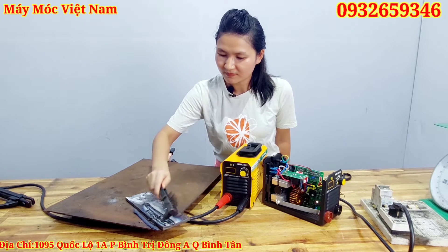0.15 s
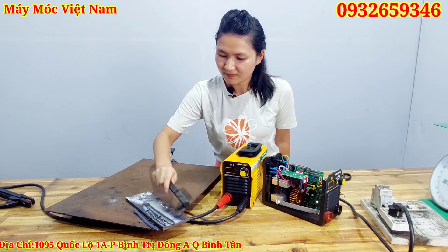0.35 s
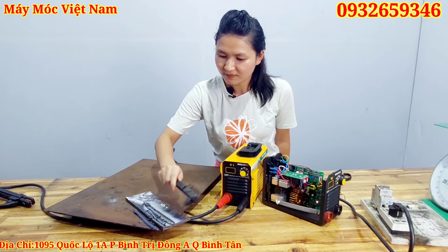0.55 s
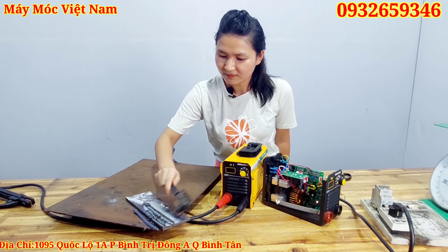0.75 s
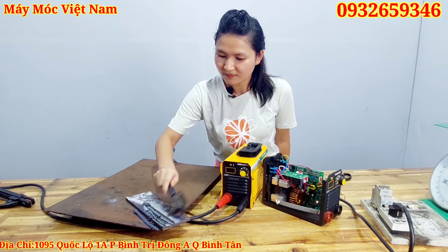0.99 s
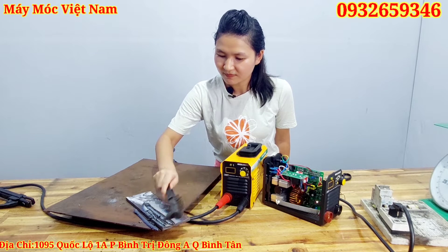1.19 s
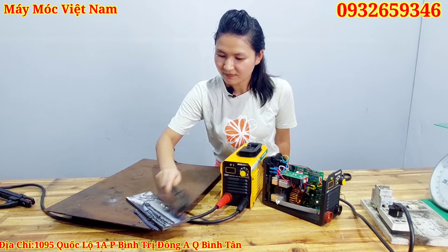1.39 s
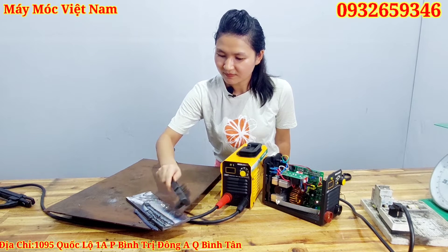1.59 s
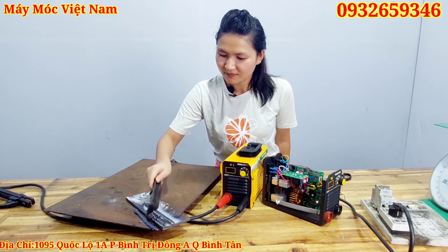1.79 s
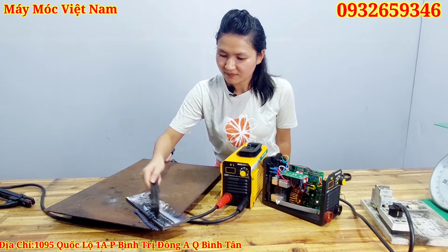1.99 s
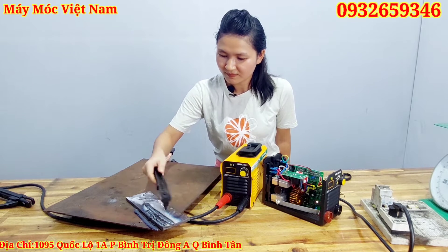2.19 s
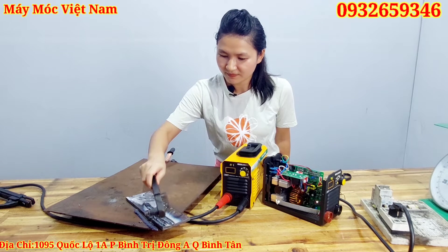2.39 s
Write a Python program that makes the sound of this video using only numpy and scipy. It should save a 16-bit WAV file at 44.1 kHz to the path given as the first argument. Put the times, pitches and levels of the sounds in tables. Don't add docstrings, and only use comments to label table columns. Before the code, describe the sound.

Steady metallic hammer blows on a small steel piece, each clank bright, rattling and quickly choked

```python
import sys
import numpy as np
from scipy import signal
from scipy.fft import rfft, irfft
from scipy.io import wavfile
from scipy.ndimage import uniform_filter1d, minimum_filter1d

SR = 44100
rng = np.random.default_rng(int(sys.argv[2]) if len(sys.argv) > 2 else 0)


def makeup_ratio(level_db):
    decades = np.asarray(level_db, float) / 20
    return 10 ** decades


def persist_wave(psi):
    counts = np.round(np.clip(psi, -1, 1) * 32767).astype(np.int16)
    wavfile.write(sys.argv[1], SR, np.atleast_2d(counts).T)


N = 108045
LEAD = 4410
DRIVE_DB = 2.5


def at_hz(points, hz):
    points = np.array(points)
    return np.interp(np.log(hz), np.log(points[:, 0]), points[:, 1])


def dying(t, t60_s):
    return np.exp(-np.log(1000) * t / t60_s)


def filtered(x, order, hz, kind="low"):
    return signal.sosfilt(signal.butter(order, hz, kind, fs=SR, output="sos"), x)


# hz, level_db
FLOOR_SPECTRUM = [(25, -24), (55, -9.5), (150, -1), (400, -9.5), (1000, -15), (4000, -19.5), (9000, -35.5),
                  (14000, -52)]
FLOOR_DB = -53.5


def floor():
    hz = np.maximum(np.arange(N // 2 + 1) * SR / N, 10)
    x = irfft(rfft(rng.standard_normal(N)) * makeup_ratio(at_hz(FLOOR_SPECTRUM, hz)), N)
    return makeup_ratio(FLOOR_DB) * x / x.std()


# start_s, peak_db, thump_db (bench), clatter_db, clatter_tilt_db_per_octave
BLOWS = [
    (-.04, -18, -6, -9.5, 8.5),
    (0.2269, -15.5, 1.5, 6.5, 2),
    (0.5096, -17.5, 2, 1, -0.5),
    (0.761, -18, 10.5, 2.5, 2),
    (0.9978, -14, 3.5, 6, 3),
    (1.248, -16, 4.5, 8, 0),
    (1.5250, -19, 7, 12.5, 1),
    (1.7818, -15, 1.5, 8, 3),
    (2.0569, -13, 0, 5.5, 3),
]


def each_blow(sound):
    out = np.zeros(N + LEAD)
    starts = [int(blow[0] * SR) + LEAD for blow in BLOWS] + [N + LEAD]
    for k, start in enumerate(starts[:-1]):
        end = min(starts[k + 1] + 880, N + LEAD)
        t = np.arange(end - start, dtype=np.float32) / SR
        out[start:end] += sound(k, t)
    return out


# delay_s, loss_db, ring_time_factor
LANDINGS = [(0.013, 29, 0.87), (0.0298, 21.5, 1.234), (0.0223, 16.5, 0.91), (0.07, 34, 0.8),
            (0.044, 13, 0.86), (0.026, 5, 1), (0.078, 7, 0.81), (0.031, 1.5, 0.94), (0.034, 8.5, 1.002)]
# delay_s, strength_db, bench_tilt_db_per_octave
BOUNCES = [(.02, -20, -6), (0.022, -10, -0.8), (.016, 2.5, -1.2), (0.011, -7, -2), (0.033, -30, 0),
           (0.028, 0.5, -1), (0.013, -9, 0.5), (0.0223, 1, -1.2), (.014, -3, -0.8)]
RISE_S, BOUNCE_S, LAND_S, STOP_S = 0.0014, 0.018, 0.0015, 0.0025


def envelope(k, t, t60_s, choked):
    land_s, loss_db, factor = LANDINGS[k]
    bounce_s, bounce_db, _ = BOUNCES[k]
    until_s = BLOWS[k + 1][0] - BLOWS[k][0] if k + 1 < len(BLOWS) else 1
    rise = 1 - np.exp(-t / RISE_S)
    since = np.maximum(t - bounce_s, 0)
    touch = makeup_ratio(bounce_db) * (1 - np.exp(-since / LAND_S)) * np.exp(-since / BOUNCE_S)
    again = 1 + touch * np.sqrt(np.abs(choked))[:, None]
    landed = np.clip((t - land_s) / LAND_S, 0, 1)
    choke = makeup_ratio(-loss_db * np.outer(choked, landed))
    stop = np.exp(-np.maximum(t - until_s, 0) / STOP_S)
    return again * dying(t, factor * t60_s[:, None]) * choke * rise * stop


def bursts(rows, t60_s, low_hz, high_hz):
    out, t = np.zeros(N + LEAD + 4410), np.arange(4410) / SR
    for start_s, db in rows:
        start = int(start_s * SR) + LEAD
        out[start:start + 4410] += makeup_ratio(db) * rng.standard_normal(4410) * dying(t, t60_s)
    return filtered(out, 2, [low_hz, high_hz], "band")[:N + LEAD]


def cracks():
    return bursts([(blow[0], blow[1] - 16.5) for blow in BLOWS], 0.0043, 8240, 13000)


GLIDES = [0.045, 0.019, 0.017, 0.036, .1, 0.036, 0.094, 0.059, 0.022]
GLIDE_S, SWELL_S = 0.0191, 0.013
FLUTTER_DB, FLUTTER_PER_S = 2.5, 40.3
SHRILL_HZ = 6000


def struck(hz, db, t60_s, choked, flutter_db, glide=0):
    phase = rng.uniform(0, 2 * np.pi, db.shape)
    knots = rng.standard_normal(db.shape + (40,))

    def sound(k, t):
        coarse = np.arange(len(t) // 16 + 2) * 16 / SR
        at = np.minimum(coarse * FLUTTER_PER_S, 38)
        knot, between = at.astype(int), at % 1
        waver = knots[k][:, knot] * (1 - between) + knots[k][:, knot + 1] * between
        shape = envelope(k, coarse, t60_s, choked) * makeup_ratio(flutter_db[:, None] * waver)
        shape *= 1 - np.outer(glide * hz > 0, np.exp(-coarse / SWELL_S))
        step, part = np.divmod(np.arange(len(t)), 16)
        shape = shape[:, step] + np.diff(shape)[:, step] * (part / 16)
        lag = np.outer(GLIDES[k] * glide * hz, GLIDE_S * (1 - np.exp(-t / GLIDE_S)))
        cycles = np.outer(hz, t) - lag
        return makeup_ratio(db[k]) @ (np.sin(2 * np.pi * cycles + phase[k, :, None]) * shape)
    return each_blow(sound)


PLATE_HZ = [
    [563.5],
    [582],
    [812, 2160],
    [1009],
    [1089],
]
PIECE_HZ = [
    [1200, 1228, 1240],
    [1306, 1995, 1965],
    [1550, 1475, 1760, 1812],
    [1603],
    [2312, 2575, 2960],
]
SEAM_HZ = [
    [3177, 3213, 2850],
    [3297, 3456],
    [3818, 3786],
    [5830, 5996, 5968],
    [7882, 11800],
]
HAMMER_HZ = [
    [3890, 4035],
    [4160, 4225, 4580, 4790],
    [4288],
    [5385],
    [8440, 9610, 10190, 8800, 14080, 14260],
]
TIP_HZ = [
    [6676, 6640],
    [10970, 11040],
    [14170, 14350],
]
# level_db, t60_s
PLATE = [(-22.0, 1.05), (-28, 0.69), (-36, 0.79), (-34, 0.68), (-35.0, 1.25), (-30.0, 1.42)]
# level_db, t60_s
PIECE = [(-14, 0.28), (-5, 0.42), (-17, 0.43), (-15, 0.28), (-12.5, 0.33), (-21.5, 0.42), (-11.5, 0.11),
         (-32, 0.31), (-28.5, 0.4), (-37, 0.39), (-15.5, 0.6), (-26, 0.64), (-22.5, 0.4), (-20.5, 0.28)]
# level_db, t60_s
SEAM = [(-16, 0.29), (-18.5, 0.49), (-29.5, 0.35), (-14, 0.22), (-19.0, 0.37), (-9.5, 0.3), (-19, 0.24),
        (-23.0, 0.39), (-22.5, 0.27), (-23.5, 0.49), (-26.5, 0.19), (-53, 0.2)]
# level_db, t60_s
HAMMER = [(-14, 0.28), (-9.5, 0.059), (-23, 0.21), (-15, 0.28), (-18.5, 0.17), (-30, 0.19), (-25, 0.64),
          (-22.5, 0.95), (-59, 0.16), (-38, 0.17), (-48, 0.29), (-44, 0.4), (-55, 0.2), (-50, 0.18)]
# level_db, t60_s
TIP = [(-20, 0.41), (-13, 0.12), (-43, .4), (-49, .15), (-58, .15), (-58, .12)]
PLATE_SHARES = [(-11.5, -13, -1, 4.5, 12.5), (1.5, 2.5, 5, 6, -3), (5, 3, 0, 9, -1.0), (5, 11, 5, 10.5, 3),
                (-1, 8, -2, 0, -4), (7, 9, 6.5, -15, 10.5), (-8, -10, 15.5, -8, 5), (1.5, 6, 10.5, -19, -6),
                (-0.5, 6, 0.0, -17, 6)]
PIECE_SHARES = [(-14, -21, -9.0, -14.5, -12.0), (0.5, 6.5, 7, -1.5, 2), (-2.5, -3, -17, 0, -12),
                (-1.5, -3, 5.5, -20, -7), (-6, -10.5, 6, 2.5, 1), (-2.5, -4.5, 10, 1, 2),
                (4.5, 6, 16, 5, 4.0), (1.5, 5.5, 1, -0.5, 2), (3.5, 4, -22, -7.5, -14)]
SEAM_SHARES = [(-5, -22, -10, -38, -21), (-9, 3, 0, 15.5, 0.0), (-13, -16.5, -17.5, -3.5, 2),
               (-12, -2.5, -2, 3.5, -12), (2.5, -3.5, 0, -3, -15), (2.5, -2, 1, -2.5, -1),
               (7, -6, 4.5, 3.5, 20.5), (1.5, 5.5, -2, 2, 1), (6.5, 6.5, 9.5, -1.0, -6.0)]
HAMMER_SHARES = [(-10, -5, -11, -13, 0), (-11, -19, 2.0, 15, 3), (-11, -0.5, -3.0, -8.0, 5),
                 (9.5, 7.5, 6.5, 5, 16.5), (2, 8.5, 12.0, 8, 8.5), (0.5, 0, -2, -5.5, -2),
                 (8, 8, -12, 3, -4), (-5, -2.5, -21, -1.5, 4), (6.5, -19, -4, -19, -8)]
TIP_SHARES = [(-8, -8, -8), (-0.5, 9, 4), (-6.5, 0, 1), (-1, 1.5, 7), (7, 10, 4), (3, -2, -3),
              (8.5, -3, 1.5), (-21, -6, 1.5), (4.5, 2, -3)]
CHOKED = [(0.13, 0.17, 0.05, 0.048, 0.031), (0.21, 0.39, 0.63, 0.14, 0.16), (0.6, 0.55, 1, 0.96, .3),
          (.29, 0.28, 0.22, 1.3, 0.1)]
TIP_CHOKED = [0.51, .2, .3]


def steel():
    families = PLATE_HZ + PIECE_HZ + SEAM_HZ + HAMMER_HZ + TIP_HZ
    hz = np.concatenate(families)
    family = np.repeat(np.arange(len(families)), [len(f) for f in families])
    db, t60_s = np.transpose(PLATE + PIECE + SEAM + HAMMER + TIP)
    shares = np.hstack([PLATE_SHARES, PIECE_SHARES, SEAM_SHARES, HAMMER_SHARES, TIP_SHARES])[:, family]
    choked = np.append(CHOKED, TIP_CHOKED)[family]
    scatter_db = 1.0 * rng.standard_normal(shares.shape)
    db = db + shares + np.array(BLOWS)[:, 1:2] + scatter_db
    flutter_db = FLUTTER_DB * np.sqrt(np.abs(choked)) * (1.22 + hz / SHRILL_HZ)
    bending = family == len(PLATE_HZ)
    return struck(hz, db, t60_s, choked, flutter_db, bending)


# pitch_hz, level_db, t60_s
RUSH = [(670, -58, 0.075), (1085, -31.5, 0.15), (1727, -23.5, 0.14), (3045, -30.5, 0.26), (3460, -26, 0.23),
        (5750, -31, 0.087), (8200, -61, 0.04), (11600, -72, 0.089)]
CLATTER_CHOKED = 0.55


def rush():
    hz, db, t60_s = np.transpose(RUSH)
    bands = np.array([filtered(rng.standard_normal(N), 3, [f / 1.203, f * 1.228], "band") for f in hz])
    bands /= bands.std(axis=1, keepdims=True)

    def sound(k, t):
        _, peak_db, _, own_db, tilt = BLOWS[k]
        gains = makeup_ratio(db + 8 + peak_db + own_db + tilt * np.log2(hz / 2500))
        noise = bands[:, k * 9000:][:, :len(t)]
        return gains @ (noise * envelope(k, t, t60_s, CLATTER_CHOKED + 0 * hz))
    return each_blow(sound)


# hz, level_db
CLATTER = [(150, -34.5), (420, -23), (978, -23.5), (1200, -5.5), (1430, -17.5), (3890, -19), (8040, -27.5),
           (14500, -59), (15500, -103)]
CLATTER_DB, CLATTER_T60_S, CLATTER_T60_SLOPE = -9, 0.087, -0.45


def clatter():
    hz = np.linspace(16, 124, num=130) ** 2 * rng.uniform(0.96, 1.02, size=130)
    _, peak_db, _, own_db, tilt = np.transpose(BLOWS)[:, :, None]
    db = CLATTER_DB + peak_db + own_db + tilt * np.log2(hz / 2500) + at_hz(CLATTER, hz)
    db = db + 5 * rng.standard_normal(db.shape)
    t60_s = CLATTER_T60_S * (hz / 2500) ** CLATTER_T60_SLOPE * rng.uniform(0.34, 1.54, len(hz))
    flutter_db = FLUTTER_DB * (0.58 + hz / SHRILL_HZ)
    return struck(hz, db, t60_s, CLATTER_CHOKED + 0 * hz, flutter_db)


# pitch_hz, level_db, t60_s
THUMP = [(122, -25, 0.049), (209.5, -18, 0.048), (302, -20.5, 0.081), (410.7, -21.5, 0.11),
         (517.4, -10, 0.075)]


def bench():
    hz, db, t60_s = np.transpose(THUMP)
    blow_db = np.array(BLOWS)[:, 1:3].sum(axis=1, keepdims=True)
    tilt_db = np.outer(np.array(BOUNCES)[:, 2], np.log2(hz / 300))
    db = db + blow_db + tilt_db
    return struck(hz, db + 1.4 * rng.standard_normal(db.shape), t60_s, 0 * hz, 0 * hz)


ROOM_DB, ROOM_T60_S, ROOM_DULL_HZ, ROOM_GAP_S = -6.5, 0.46, 4580, 0.0026


def room(x):
    t = np.arange(SR) / SR
    noise = rng.standard_normal(SR) * (t > ROOM_GAP_S)
    low = filtered(noise, 1, ROOM_DULL_HZ)
    tail = low * dying(t, ROOM_T60_S) + (noise - low) * dying(t, 0.75 * ROOM_T60_S)
    tail /= np.sqrt(np.sum(tail ** 2))
    return makeup_ratio(ROOM_DB) * signal.fftconvolve(x, tail)[:len(x)]


# start_s, level_db
TICKS = [(.127, -47.5), (.170, -53), (.638, -46.5), (.646, -41), (.68, -48), (.740, -49), (.915, -39.5),
         (.938, -47), (1.122, -50), (1.18, -47), (1.227, -49), (1.5295, -41), (2.071, -44)]


def ticks():
    return bursts(TICKS, t60_s=0.021, low_hz=2530, high_hz=8300)


# start_s, pitch_hz, level_db, length_s
RINGS_AGAIN = [(.342, 5998, -41, .018), (.921, 5385, -47, .022), (.956, 5385, -50, .011),
               (.972, 5385, -52, .03), (1.077, 5385, -37, .010), (1.142, 5385, -43, .008),
               (1.163, 5385, -45, .059), (1.227, 5385, -51, .03), (.918, 4285, -47, .09)]
RING_AGAIN_T60_S = 0.47


def rings_again():
    t = np.arange(N + LEAD) / SR - LEAD / SR
    out = np.zeros(N + LEAD)
    for start_s, hz, db, length_s in RINGS_AGAIN:
        gate = np.clip(np.minimum(t - start_s, start_s + length_s - t) / RISE_S, 0, 1)
        gate = gate * dying(np.maximum(t - start_s, 0), RING_AGAIN_T60_S)
        out += makeup_ratio(db - DRIVE_DB) * np.sin(2 * np.pi * hz * t) * gate
    return out


STEEL_WET = 0.34
MIC_LOW_HZ, ROUGH_TOP_HZ = 94, 12900


def scene():
    crack = cracks()
    clear = steel() + rings_again()
    rough = filtered(rush() + clatter() + bench() + ticks(), 6, ROUGH_TOP_HZ)
    heard = clear + rough + crack + room(STEEL_WET * clear + rough)
    heard = filtered(heard, 2, MIC_LOW_HZ, "high")
    return (makeup_ratio(DRIVE_DB) * heard[LEAD:] + floor())[None]


def roll_off(x):
    return signal.sosfilt(signal.butter(12, 16470, fs=SR, output="sos"), x)


LIMIT_DB, RELEASE_DB_PER_S, LOOKAHEAD_S = -6.7, 203, 0.003


def record(dry):
    ahead = max(int(LOOKAHEAD_S * SR), 2)
    slope = RELEASE_DB_PER_S * np.arange(N) / SR
    over = np.maximum(20 * np.log10(np.abs(dry[0]) + 1e-9) - LIMIT_DB, 0)
    held = np.maximum.accumulate(over + slope) - slope
    held = -minimum_filter1d(-held, size=2 * ahead + 1)
    held = uniform_filter1d(held, size=ahead)
    return roll_off(dry * makeup_ratio(-held))


dry = scene()
out = record(dry)
persist_wave(out)
```